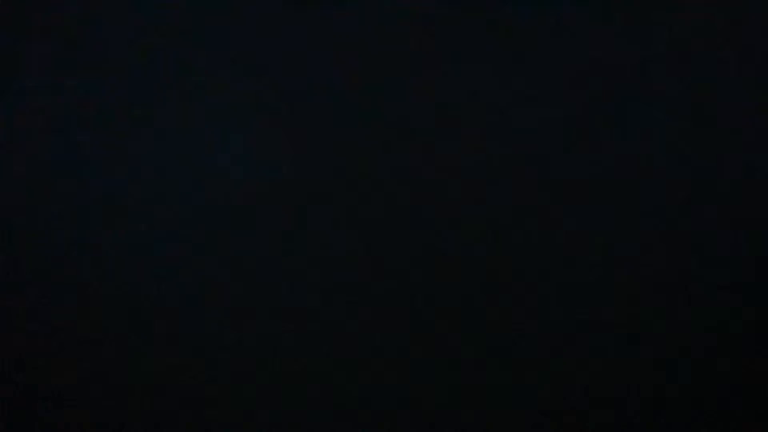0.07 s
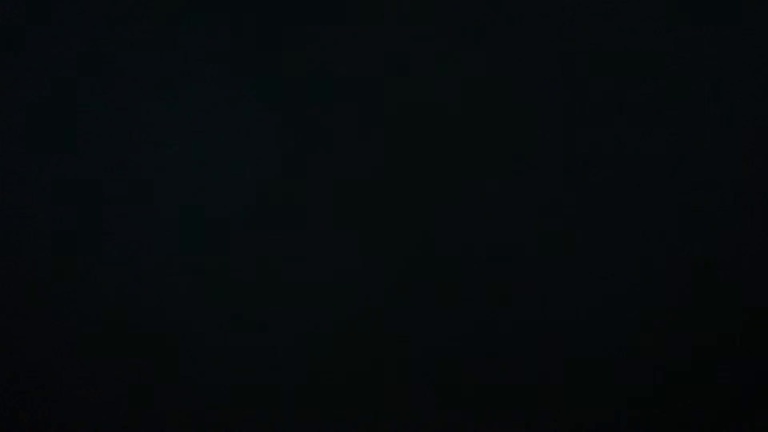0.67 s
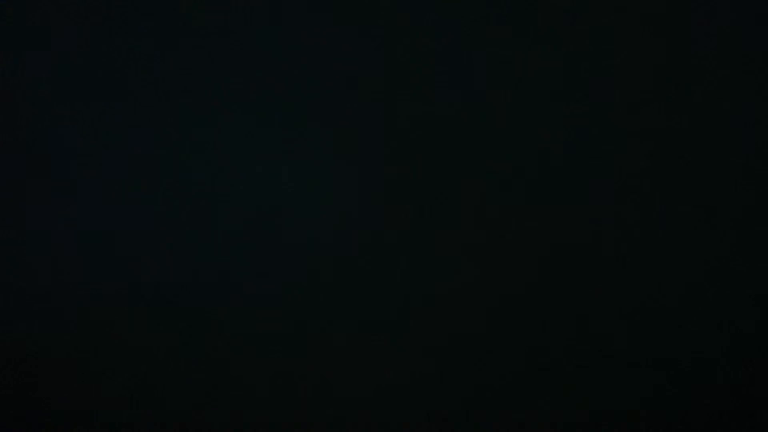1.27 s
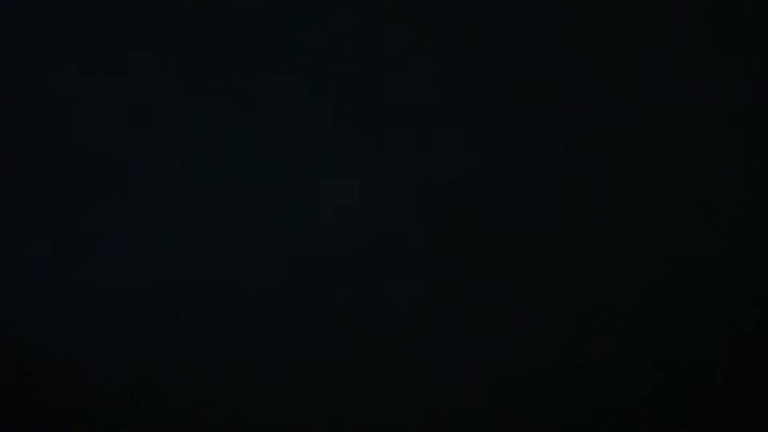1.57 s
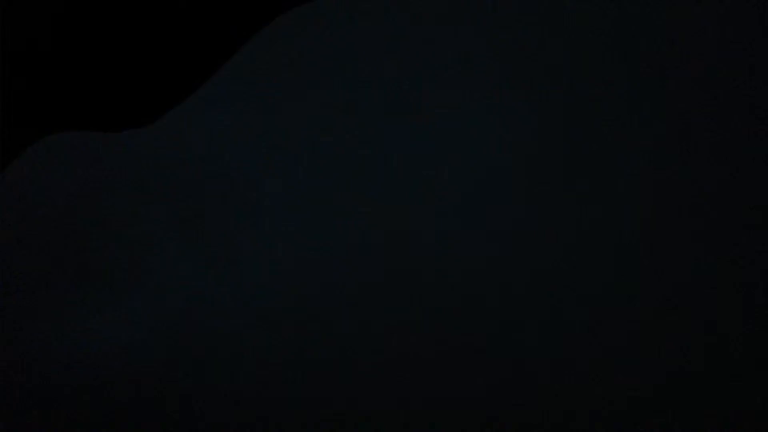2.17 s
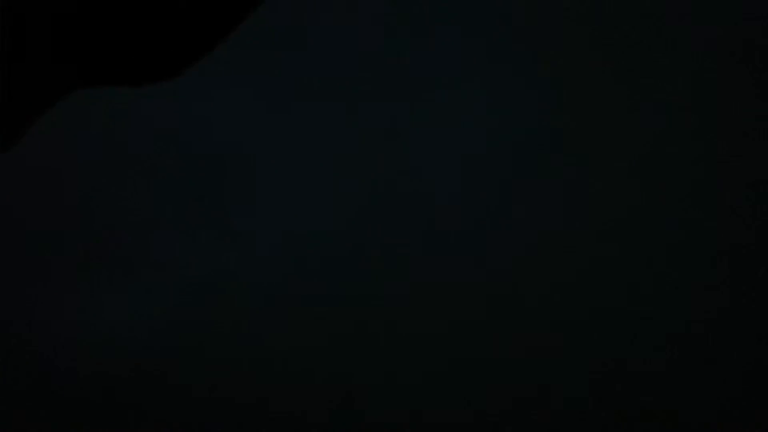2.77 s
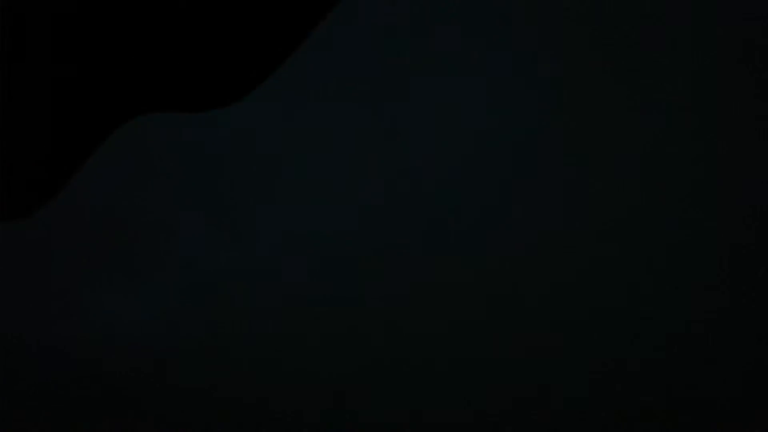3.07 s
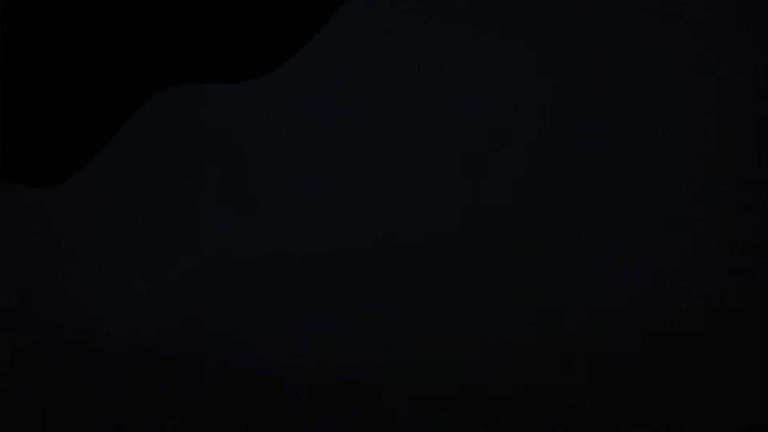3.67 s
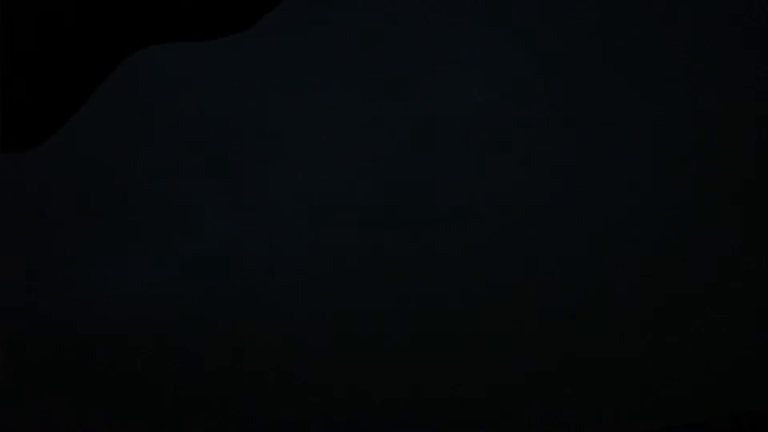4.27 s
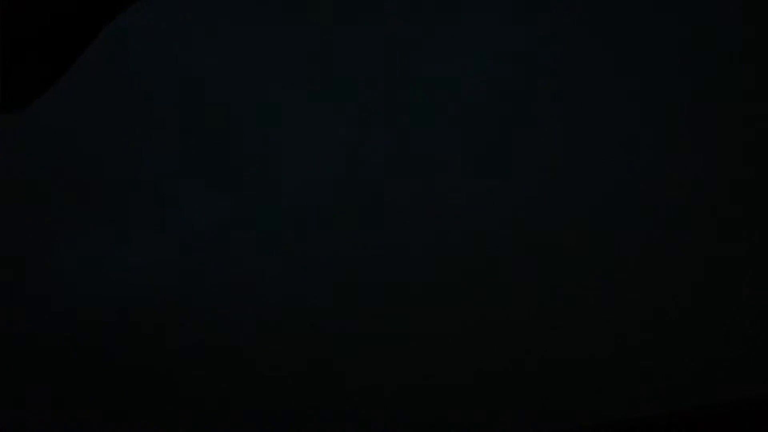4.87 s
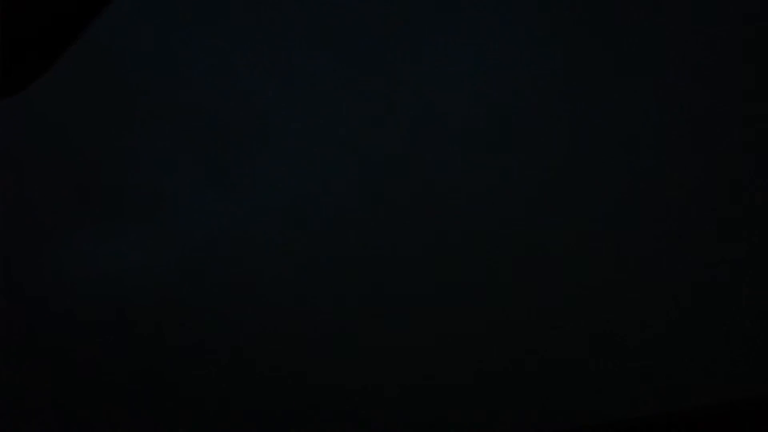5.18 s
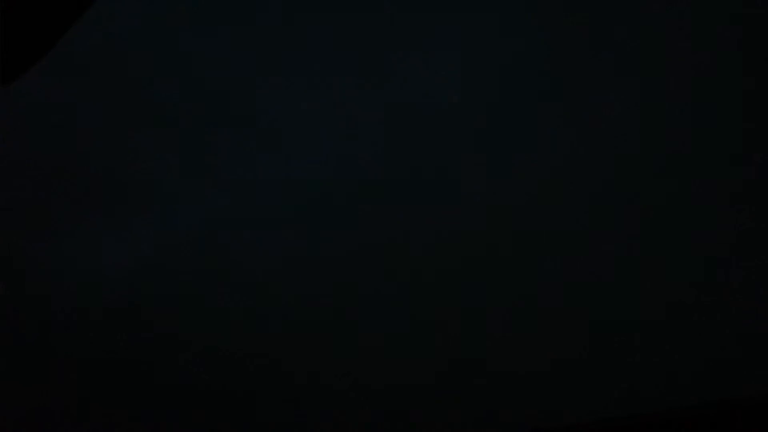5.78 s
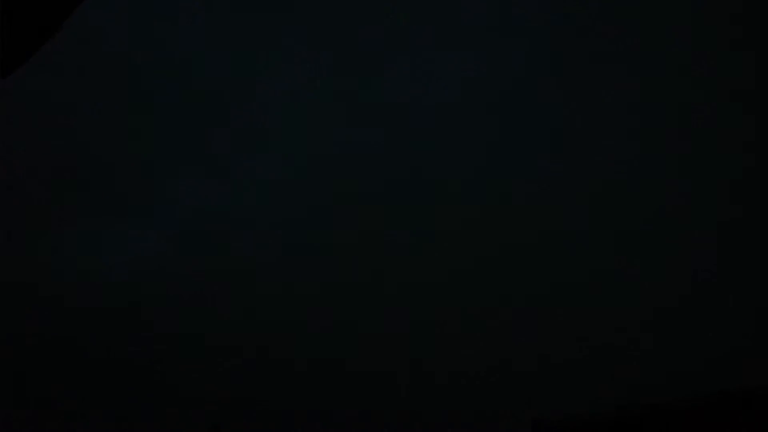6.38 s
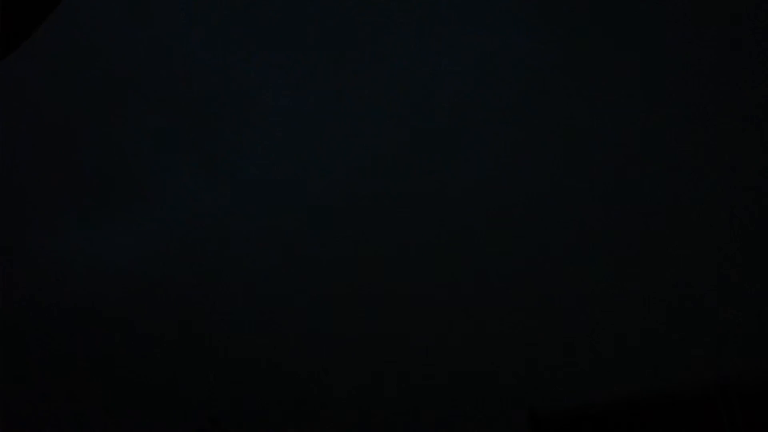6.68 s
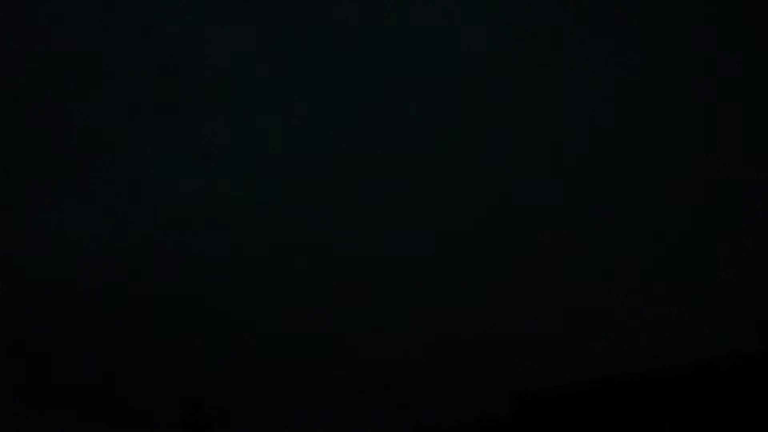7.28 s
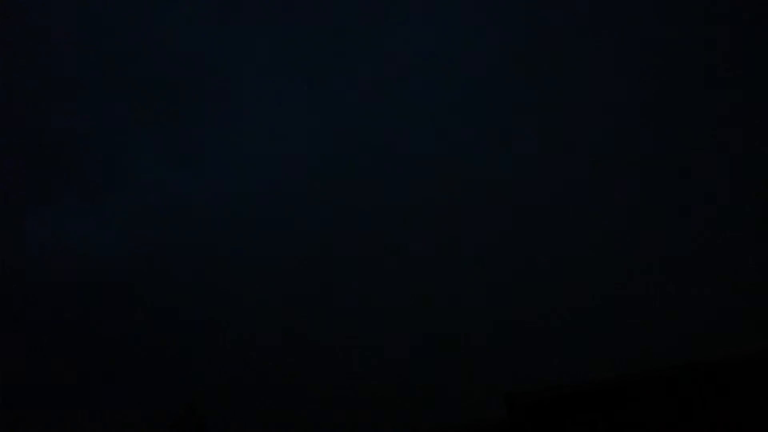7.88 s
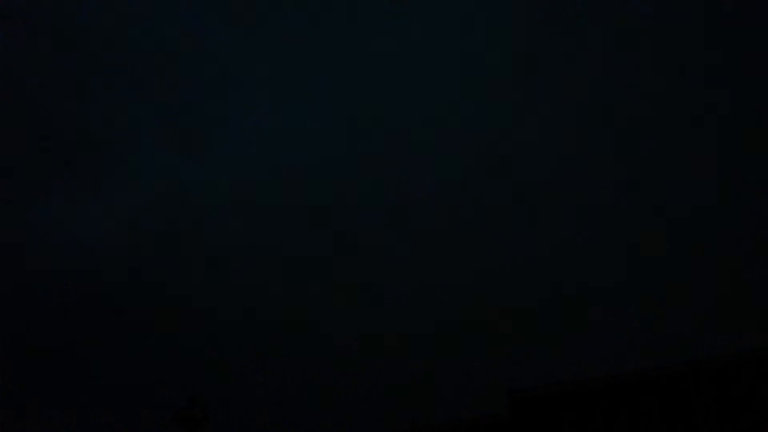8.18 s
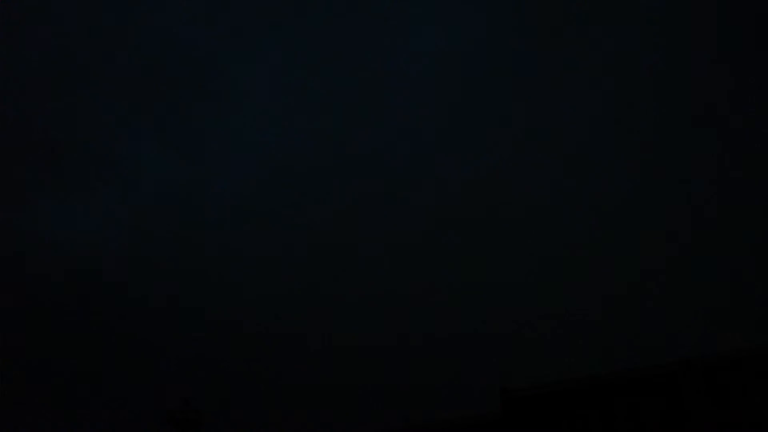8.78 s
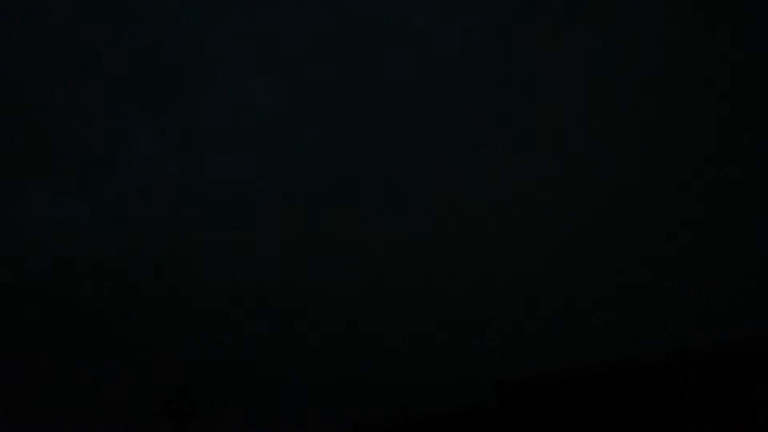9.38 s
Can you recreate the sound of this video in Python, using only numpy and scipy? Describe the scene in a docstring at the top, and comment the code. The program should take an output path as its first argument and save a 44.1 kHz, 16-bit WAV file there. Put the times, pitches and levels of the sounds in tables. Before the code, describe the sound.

Scattered drops splat, tick and knock on a hollow surface against soft rain, a distant rumble and a faintly buzzing motor.

```python
"""A quiet, wet night outdoors. After 0.8 s of silence, light rain hiss and far patter fade in over
a low distant rumble and the faint hum and buzz of a motor, probably an air conditioner.
From 1 s, near drops ring on wet things; from 1.8 s, run-off splats on the ground and fine drops tick.
From 2.7 s, heavy drops knock on a hollow surface. The rumble, which swells briefly near 2 s,
swells again near 6 s and three times around 9 s."""
import sys
import numpy as np
from scipy import signal
from scipy.fft import rfft, irfft, next_fast_len
from scipy.io import wavfile
from scipy.ndimage import uniform_filter1d

SR = 44100
rng = np.random.default_rng(int(sys.argv[2]) if len(sys.argv) > 2 else 0)


def digitize_waveform(pressure):
    """Quantize a signal to 16-bit integers and store it at the path in sys.argv[1].

    Rows of a 2-D input are taken as channels; values are limited to [-1, 1].
    """
    field = np.atleast_2d(pressure).T
    bounded = np.clip(field, -1, 1)
    quanta = np.round(bounded * 32767).astype(np.int16)
    wavfile.write(sys.argv[1], SR, quanta)


N = 420273

# noise spectra: (frequency [Hz], relative density [dB])
RAIN_SPECTRUM = [(400, -8), (850, 3.5), (1500, 3), (2600, -1), (3300, -4.5), (4400, -4), (5800, -3),
                 (6400, -5.5), (7100, -10), (9000, -12.5), (11000, -18.5), (14500, -31)]
SPRAY_SPECTRUM = [(200, 7), (500, -2), (800, 15.5), (1300, 7), (2300, 10.5), (4000, 8), (5900, 13.5),
                  (7300, 5.5), (10000, -3.5), (14500, -16)]
TICK_SPECTRUM = [(4000, -20), (8000, -5), (11000, -3), (14000, -2)]
PATTER_SPECTRUM = [(1000, -8), (2500, -4), (4000, -5), (5600, 1), (6500, -3), (7500, -10), (11000, -18),
                   (14500, -28)]
RUMBLE_SPECTRUM = [(25, -36), (38, -31), (52, -2.5), (64, -5.5), (85, -1.5), (110, 2.5), (132, -0.5),
                   (148, 1), (170, -1.5), (210, 0), (260, -5.5), (350, -15), (600, -43)]
SWELL_SPECTRUM = [(60, -33), (100, -15), (125, 7.5), (160, -1), (210, -3.5), (350, -29)]
RUSH_SPECTRUM = [(170, -41), (290, 1.5), (500, 1.5), (660, -1.5), (800, -8.5), (1300, -30)]
# run-off impacts: (time [s], spray level [dB], slap offset [dB])
SPLAT_HITS = [(1.803, -42, -16), (2.286, -44, -17), (2.714, -36.5, -1.5), (3.186, -38, -12),
              (3.247, -44, -17), (3.449, -35, -4.5), (3.517, -41, -2), (3.611, -43, -6), (5.088, -45, -12),
              (5.335, -43, -8), (5.400, -37.5, 0.5), (5.903, -42.5, -8), (5.944, -34.5, -1.5),
              (7.288, -37.5, -15), (7.393, -44.5, -15), (8.063, -37.5, 2)]
# dull resonances of the water slap: (frequency [Hz], width [Hz], gain [dB])
SLAP_BANDS = [(495, 60, -5), (720, 300, -8), (1100, 120, -7), (1500, 500, -11), (2200, 150, -9)]
# near drops; wetter rings wider: (time [s], ring [Hz], spread [Hz], ring [dB], decay [s], L-R [dB])
NEAR_HITS = [(1.0533, 5780, 260, -29.3, .0028, 3.5), (1.882, 5950, 650, -33, .004, -1.5),
             (2.213, 5800, 550, -41, .005, 0), (2.297, 5600, 450, -43, .006, 0),
             (2.922, 5500, 300, -42, .006, 0), (3.2352, 3450, 110, -24, .0017, 2.5),
             (3.823, 5700, 400, -37.5, .005, -3), (4.269, 5600, 400, -37.5, .005, -3),
             (4.484, 5600, 450, -40.5, .006, 0), (5.0853, 5100, 1900, -32.5, .003, -6),
             (5.344, 5000, 300, -42, .006, 0), (8.070, 5650, 300, -39, .002, 2),
             (8.367, 5500, 520, -34.5, .0045, -6)]
# heavy drops: (time [s], level [dB], lowest mode [Hz], tilt [dB/octave])
KNOCK_HITS = [(2.712, -33, 495, 0), (3.453, -41, 470, -1), (3.520, -36, 510, -7), (5.402, -33, 485, -6),
              (5.947, -38.5, 570, -5), (6.265, -38, 495, -10), (6.374, -40, 495, -8),
              (8.068, -32, 495, -1.5), (8.284, -43, 495, -2), (8.503, -37, 495, -8), (8.698, -38, 495, -10),
              (8.943, -38.5, 495, -6)]
# hollow surface modes: (ratio to lowest mode, gain [dB], rise [s], decay [s])
SURFACE_MODES = [(1, 1, .006, .009), (1.8, -10, .006, .008), (2.25, -5, .011, .009),
                 (3.05, -11, .009, .006), (4.35, -16, .008, .007)]
# finest, closest drops: (time [s], level [dB])
TICK_HITS = [(1.882, -53), (2.2085, -43.5), (3.163, -52), (3.235, -46), (3.461, -48), (4.123, -49),
             (5.086, -44), (5.094, -39), (5.947, -46), (6.058, -53), (6.986, -52), (9.449, -50)]
# larger far drops: (time [s], level [dB])
FAR_HITS = [(0.944, -44), (1.157, -45), (1.439, -43), (1.845, -44), (1.979, -42), (2.250, -47),
            (2.325, -44), (2.355, -42), (2.463, -43), (2.790, -43), (2.907, -44), (2.974, -44),
            (3.336, -42), (4.357, -42.5), (4.614, -46), (5.002, -45), (5.321, -44), (6.054, -43),
            (6.862, -42.5), (7.113, -43), (7.211, -44), (7.893, -43), (8.651, -44), (8.858, -44),
            (9.499, -44)]
# outline of the motor harmonics: (frequency [Hz], relative level [dB])
BUZZ_OUTLINE = [(300, 5), (900, -4), (1500, -1), (2800, 4.5), (4200, 2), (5700, -4), (6700, -25),
                (8000, -5), (9200, -8), (10500, -36)]
# motor and fan tones: (frequency [Hz], rms level [dB], L-R [dB])
MOTOR_TONES = [(73.5, -52, 0), (118, -51.7, -1), (235.6, -49.8, 1), (294.5, -58.5, 0), (412, -62, -3),
               (647.5, -56.3, 0), (883.4, -66, 0), (993, -58.7, -8), (1178.5, -64, -2), (1295, -63.5, -2),
               (1402, -63, -1), (1518, -64.5, 1), (2942.5, -69, 0), (4086.5, -71, 0), (8588, -72, 7),
               (8884, -78, 5), (9180, -78, 5)]
# distant swells: (peak time [s], rumble [dB], rush [dB], 1/e rise and fall [s])
RUMBLE_SWELLS = [(2.16, -38.5, -58, 0.24), (6.30, -38, -44, 0.29), (8.61, -35.5, -61, 0.1),
                 (8.97, -34.5, -43, 0.071), (9.25, -39, -41, 0.21)]
# diffuse field: (frequency [Hz], L/R coherence [0..1])
COHERENCE = [(60, 0.99), (130, 0.96), (290, 0.85), (640, 0.45), (1300, 0), (3000, 0)]
# colour difference of the two microphone ports: (frequency [Hz], L-R [dB])
PORT_BALANCE = [(100, -.5), (450, -1), (850, .5), (1300, 4.5), (2400, 5.5), (4300, 5.5), (6000, 3.5),
                (7000, -0.5), (9500, 1), (12000, -6.5), (14500, -10.5)]


def rain_hiss(level_db=-42):
    """Light rain all around merges into a steady hiss."""
    return from_db(level_db) * coloured(diffuse_noise(), RAIN_SPECTRUM)


def splats(rise_s=.0076, decay_s=.032, spatter_db=-17, spatter_decay_s=.06, slap_trim_db=-1.5):
    """Run-off slaps the ground and breaks into lumpy, grainy spray; some falls back as spatter."""
    grain_db = 3 * np.tanh(drift(1500))
    lumps_db = np.tanh(drift(200))
    spray = coloured(diffuse_noise() * from_db(grain_db + lumps_db), SPRAY_SPECTRUM)
    push = diffuse_noise()
    slap = unit_rms(sum(from_db(db) * resonate(push, hz, width_hz) for hz, width_hz, db in SLAP_BANDS))
    spray_env, slap_env = np.zeros((2, N))
    for start_s, level_db, slap_db in SPLAT_HITS:
        impact = burst(start_s, rise_s, decay_s)
        spatter = from_db(spatter_db) * burst(start_s, rise_s + decay_s, spatter_decay_s)
        spray_env += from_db(level_db) * np.hypot(impact, spatter)
        slap_env += from_db(level_db + slap_db + slap_trim_db) * impact
    spray_env = uniform_filter1d(spray_env, size=500)  # water lands over 11 ms
    return spray * spray_env * panned(pan_db=2.5) + slap * slap_env


def near_drops(rise_s=.0015, spray_db=-43.5, bounce_s=.0037, bounce_db=-14, scatter_db=-21.5):
    """Each drop: a puff of spray, a brief unsteady ring, its ground bounce and scatter from nearby."""
    highpass = signal.butter(2, 3500, "high", fs=SR, output="sos")
    spray = coloured(rng.standard_normal((2, N)), SPRAY_SPECTRUM)
    spray = unit_rms(signal.sosfilt(highpass, spray))
    waver_s = np.cumsum(drift(2500)) / SR
    arrival_s = time_s() - np.array([[0], [40e-6]])  # right port lags
    out = np.zeros((2, N))
    for start_s, hz, spread_hz, ring_db, decay_s, pan_db in NEAR_HITS:
        direct = burst(start_s, rise_s, decay_s)
        bounce = from_db(bounce_db) * burst(start_s + bounce_s, rise_s, decay_s)
        scatter = from_db(scatter_db) * burst(start_s, rise_s=.031, decay_s=.028)
        ring = np.sin(2 * np.pi * (hz * arrival_s + spread_hz * waver_s)) * (direct + bounce + scatter)
        puff = spray * burst(start_s, rise_s, decay_s=.02)
        out += (from_db(ring_db) * ring + from_db(spray_db) * puff) * panned(pan_db)
    return out


def knocks():
    """Heavy drops ring a hollow surface briefly; some knock brightly, others thud on its lowest mode."""
    out = np.zeros(N)
    age_s = np.arange(int(.12 * SR)) / SR
    for start_s, level_db, lowest_hz, tilt_db_per_oct in KNOCK_HITS:
        first = int(start_s * SR)
        for ratio, mode_db, rise_s, decay_s in SURFACE_MODES:
            envelope = np.minimum(age_s / rise_s, 1) * np.exp(-np.maximum(age_s - rise_s, 0) / decay_s)
            gain = from_db(level_db + mode_db + tilt_db_per_oct * np.log2(ratio))
            mode = np.sin(2 * np.pi * (ratio * lowest_hz * age_s + rng.random()))
            out[first:first + len(age_s)] += gain * envelope * mode
    return out


def ticks():
    """The finest, closest drops only snap, short and bright."""
    envelope = sum(from_db(db) * burst(start_s, rise_s=.0015, decay_s=.005) for start_s, db in TICK_HITS)
    return envelope * coloured(rng.standard_normal((2, N)), TICK_SPECTRUM) * panned(pan_db=5)


def patter(rate_per_s=20, top_db=-46.8, range_db=11, width_db=10, decay_s=.013):
    """Far drops: tiny puffs of spray of random size and side; larger ones stand out in the centre."""
    when, smallness, side = rng.random((int(rate_per_s * N / SR), 3)).T
    gains = from_db(top_db - range_db * smallness) * panned(width_db * (side - .5))
    hits = np.zeros((2, N))
    hits[:, (when * N).astype(int)] = gains
    for start_s, level_db in FAR_HITS:
        hits[:, int(start_s * SR)] = from_db(level_db)
    tails = signal.lfilter([1], [1, -np.exp(-1 / (decay_s * SR))], hits + 1e-18)
    envelope = uniform_filter1d(tails, size=130)  # 3 ms rise
    return envelope * coloured(rng.standard_normal((2, N)), PATTER_SPECTRUM)


def motor(speed_wander=.000385):
    """Buzz and tones follow one slightly wandering shaft speed."""
    clock_s = time_s() + np.cumsum(speed_wander * drift(3)) / SR
    return casing_buzz(clock_s) + motor_tones(clock_s)


def casing_buzz(clock_s, turn_hz=58.89, level_db=-55.5, scatter_db=5.5):
    """Each turn shakes the casing; reflections vary each harmonic's level and phase per port."""
    orders = np.arange(5, 180)
    turn = np.linspace(0, 1, 4096)
    buzz = []
    for port in range(2):
        uneven_db = scatter_db * (2 * rng.random(len(orders)) - 1)
        gains = from_db(at_hz(BUZZ_OUTLINE, orders * turn_hz) + uneven_db)
        harmonics = np.sin(2 * np.pi * (orders[:, None] * turn + rng.random((len(orders), 1))))
        buzz.append(np.interp(clock_s * turn_hz % 1, turn, gains @ harmonics))
    return from_db(level_db) * unit_rms(np.array(buzz))


def motor_tones(clock_s, fading_share=.33, fading_per_s=9):
    """Motor and fan tones waver as part of each arrives by shifting paths."""
    out = np.zeros((2, N))
    for k, (hz, level_db, pan_db) in enumerate(MOTOR_TONES):
        # long waves reach both ports in step, short ones do not
        port_rad = (-1) ** k * np.arccos(at_hz(COHERENCE, hz)) * np.array([[.5], [-.5]])
        shifting = drift(fading_per_s) + 1j * drift(fading_per_s)
        paths = (1 + fading_share * shifting) / np.hypot(1, fading_share)
        tone = np.sqrt(2) * np.abs(paths) * np.sin(2 * np.pi * hz * clock_s + port_rad + np.angle(paths))
        out += tone * from_db(level_db) * panned(pan_db)
    return out


def rumble(steady_db=-40, rush_start_db=-46, rush_db_per_s=.1256):
    """A steady deep rumble and a slowly growing low rush; distant swells lift both."""
    deep_env = np.zeros(N)
    rush_env = from_db(rush_start_db + rush_db_per_s * time_s())
    for peak_s, deep_db, rush_db, fall_s in RUMBLE_SWELLS:
        swell = np.exp(-np.abs(time_s() - peak_s) / fall_s)
        deep_env += from_db(deep_db) * swell
        rush_env = np.hypot(rush_env, from_db(rush_db) * swell)
    steady = from_db(steady_db) * coloured(diffuse_noise(), RUMBLE_SPECTRUM)
    swells = deep_env * coloured(diffuse_noise(), SWELL_SPECTRUM)
    rush = rush_env * coloured(diffuse_noise(), RUSH_SPECTRUM)
    return steady + swells + rush


def from_db(db):
    return 10 ** (np.asarray(db) / 20)


def unit_rms(x):
    return x / np.sqrt(np.mean(x ** 2) + 1e-20)


def time_s():
    return np.arange(N) / SR


def at_hz(table, hz):
    """Interpolate on a log-frequency axis."""
    knots_hz, values = np.transpose(table)
    return np.interp(np.log(np.maximum(hz, 1)), np.log(knots_hz), values)


def filtered(x, gain):
    """Apply gain(hz) by FFT."""
    size = next_fast_len(N + 4096)
    return irfft(rfft(x, size) * gain(np.fft.rfftfreq(size, 1 / SR)), size)[..., :N]


def coloured(x, spectrum):
    """Shape x to a spectrum, cut an octave beyond its ends; rms 1."""
    low_hz, high_hz = spectrum[0][0] / 2, spectrum[-1][0] * 2
    shaped = filtered(x, lambda hz: from_db(at_hz(spectrum, hz)) * (hz > low_hz) / (1 + (hz / high_hz) ** 4))
    return unit_rms(shaped)


def panned(pan_db):
    """Stereo gains for an L-R level difference."""
    return from_db(np.array([[.5], [-.5]]) * pan_db)


def drift(rate_per_s):
    """Straight lines between unit Gaussian values."""
    knots = rng.standard_normal(int(N / SR * rate_per_s) + 2)
    return np.interp(time_s() * rate_per_s, np.arange(len(knots)), knots)


def diffuse_noise():
    """White noise from all around: channels alike in the bass, unrelated in the treble."""
    mid = filtered(rng.standard_normal(N), lambda hz: np.sqrt(1 + at_hz(COHERENCE, hz)))
    side = filtered(rng.standard_normal(N), lambda hz: np.sqrt(1 - at_hz(COHERENCE, hz)))
    return np.array([mid + side, mid - side]) / np.sqrt(2)


def resonate(x, hz, width_hz):
    """Two-pole resonance, peak gain 1."""
    radius = np.exp(-np.pi * width_hz / SR)
    feedback = [1, -2 * radius * np.cos(2 * np.pi * hz / SR), radius ** 2]
    return signal.lfilter(np.array([1, 0, -1]) * (1 - radius ** 2) / 2, feedback, x)


def burst(start_s, rise_s, decay_s):
    """Linear rise, exponential decay."""
    age_s = np.maximum(time_s() - start_s, 0)
    return np.minimum(age_s / rise_s, 1) * np.exp(-np.clip((age_s - rise_s) / decay_s, 0, 20))


def scene():
    """Rumble, rain hiss and motor, with dripping water on top."""
    bed = rumble() + rain_hiss() + motor()
    return bed + patter() + splats() + knocks() + ticks() + near_drops()


def record(dry, silence_s=.8087, fade_s=.12, cutoff_hz=14750):
    """Port colouring, fade-in after silence, steep low-pass."""
    heard = filtered(dry, lambda hz: panned(at_hz(PORT_BALANCE, hz)))
    fade = np.clip((time_s() - silence_s) / fade_s, 0, 1)
    lowpass = signal.ellip(10, .1, 80, cutoff_hz, fs=SR, output="sos")
    return signal.sosfilt(lowpass, heard * fade)


dry = scene()
out = record(dry)
digitize_waveform(out)
```